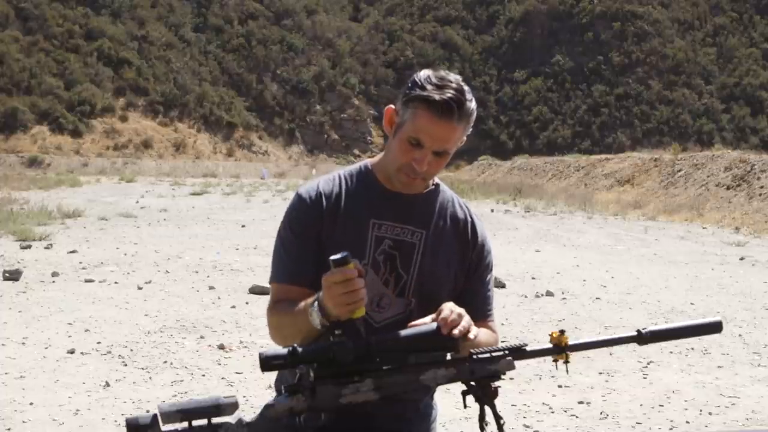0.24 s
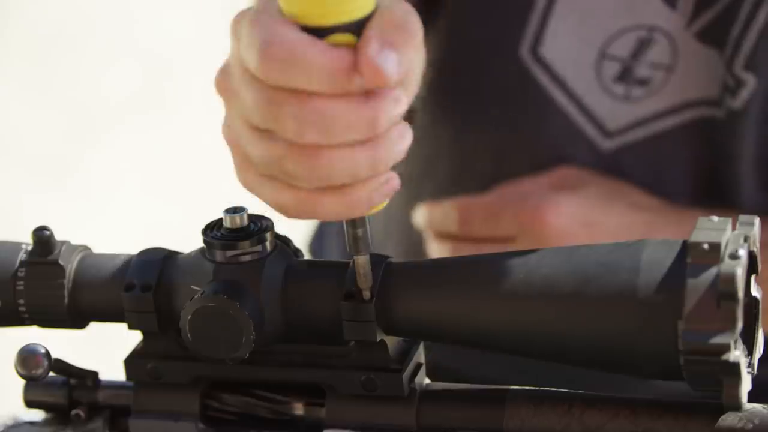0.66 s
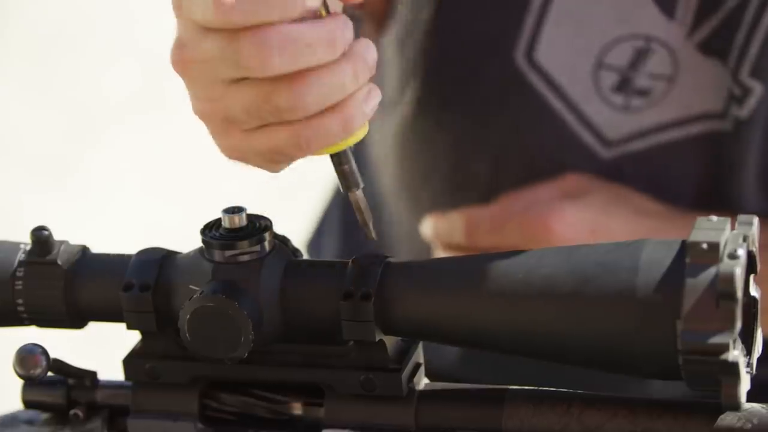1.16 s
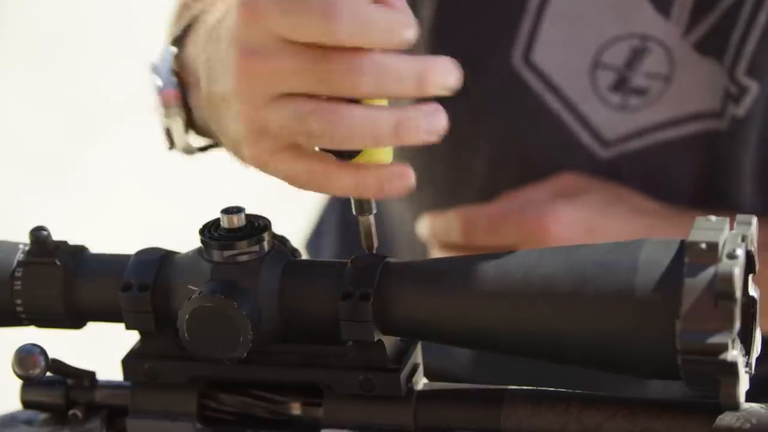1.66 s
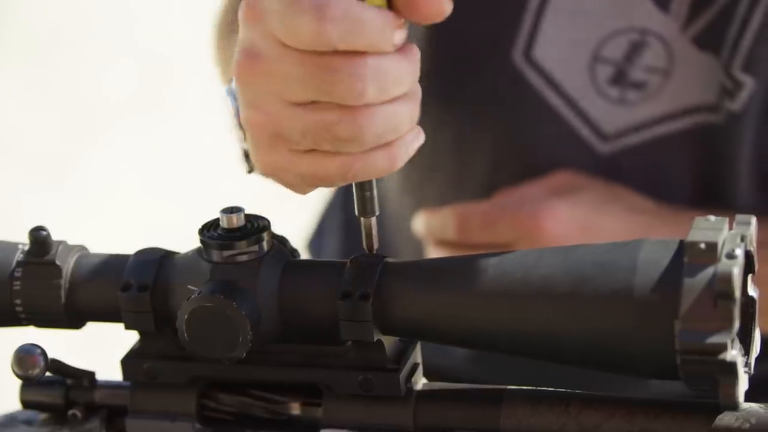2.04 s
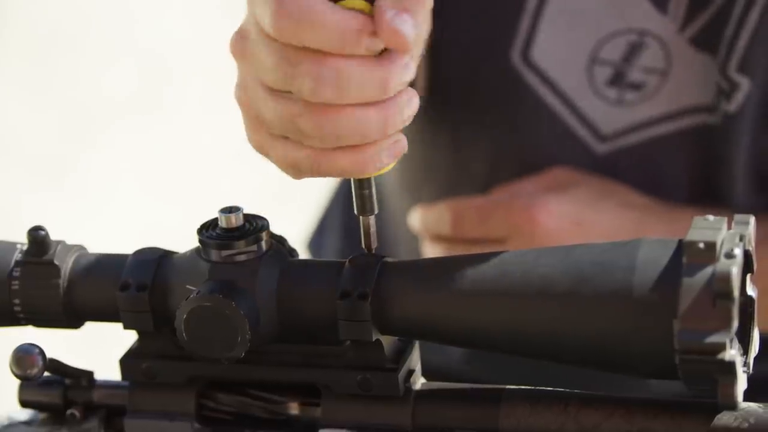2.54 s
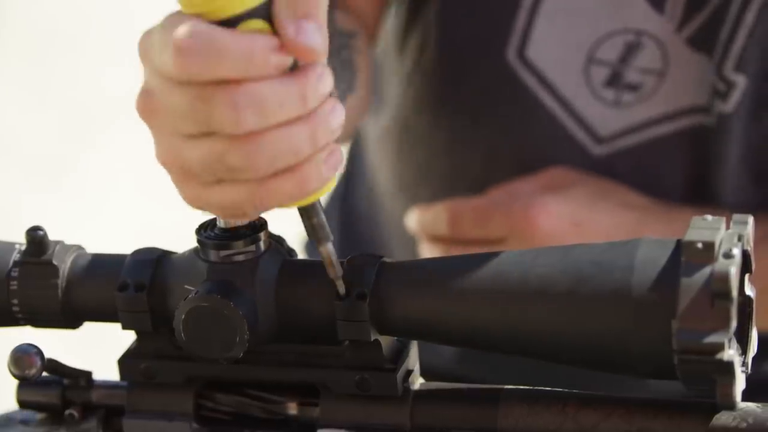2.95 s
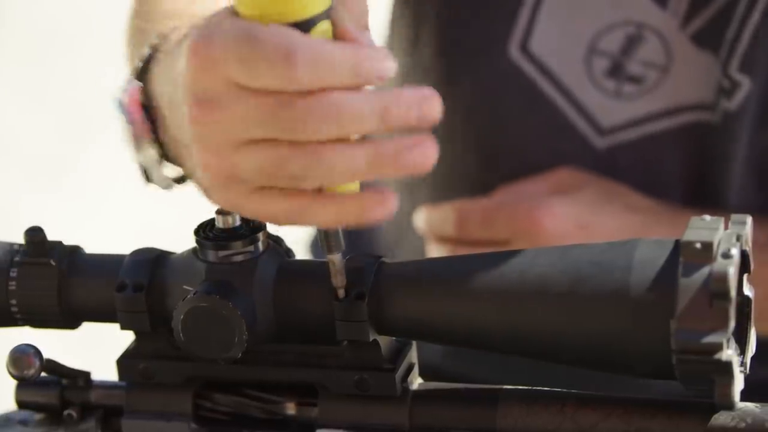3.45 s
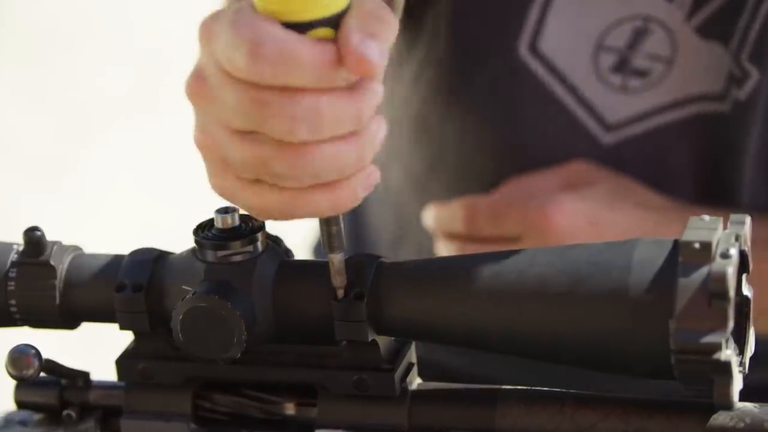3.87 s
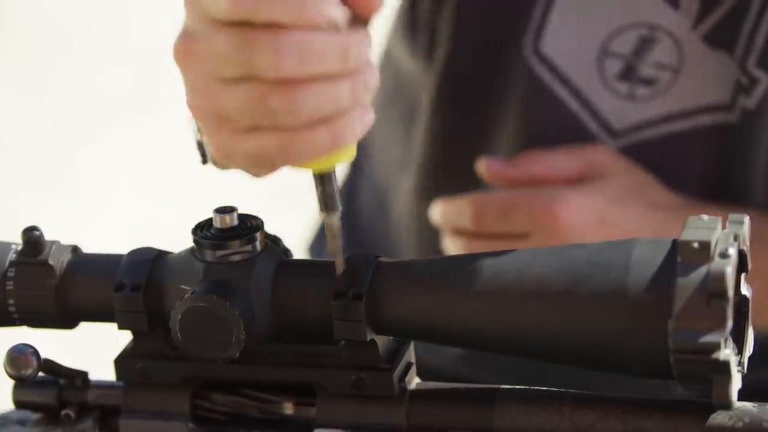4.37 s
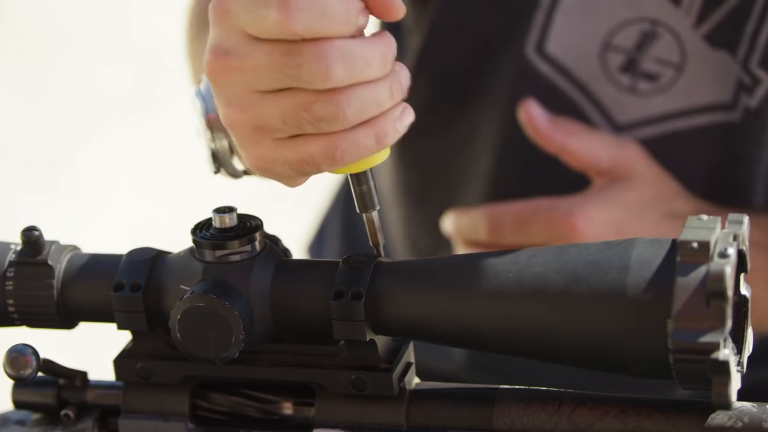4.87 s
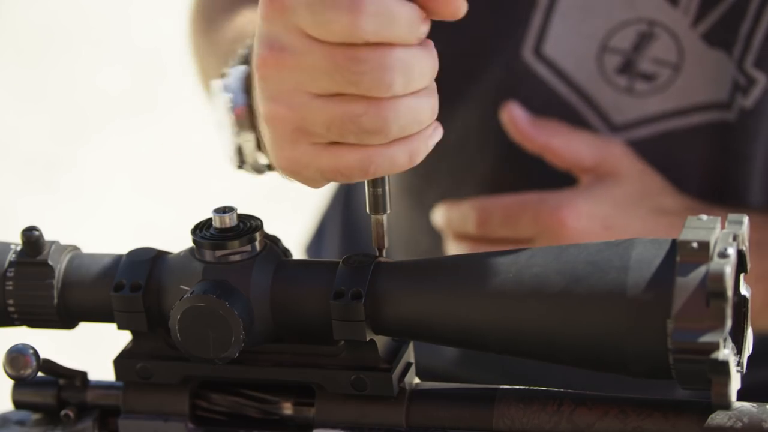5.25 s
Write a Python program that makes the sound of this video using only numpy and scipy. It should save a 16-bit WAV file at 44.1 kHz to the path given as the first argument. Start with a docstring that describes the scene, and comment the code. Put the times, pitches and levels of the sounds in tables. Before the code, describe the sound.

A torque driver tightens small screws on a metal tube mount in the open. Three loud, dry, bright snaps, evenly spaced, stand far above everything else, each with a short metallic ring and noisy scatter. Between them come gritty ticks and knocks as the bit reseats, busiest before the second snap. Wind bumps the nearby microphone; a weak hum and hiss lie behind, calmer at the end.

```python
"""Torque driver on a metal mount, outdoors

A hand-held torque driver tightens small screws: three times its clutch slips with a sharp double snap,
made of damped modes and noise, that rings the tube mount and leaves a noisy echo. Filtered noise bursts
give the bit's ticks in the screw heads, the rubbing of skin and sleeve and the low tails of knocks; steel
tones fade as sines. Wind buffets the microphone as shaped noise and single swings. An open-air murmur of
shaped noise gives way at 0.44 s to hiss and a far machine: a noise drone with one thin sine whine."""
import sys
import numpy as np
from scipy import signal
from scipy.fft import rfft, irfft, next_fast_len
from scipy.io import wavfile
from scipy.ndimage import map_coordinates

SR = 44100
rng = np.random.default_rng(int(sys.argv[2]) if len(sys.argv) > 2 else 0)


def output_pcm(signal):
    """Save a mono or channel-first signal as 16-bit PCM at the path in sys.argv[1].

    Samples are clipped to [-1, 1] before scaling.
    """
    pcm = np.clip(np.atleast_2d(signal).T, -1, 1) * 32767
    wavfile.write(sys.argv[1], SR, np.round(pcm).astype(np.int16))


def attenuation_scalar(level_db):
    """Turn a level in dB into a linear amplitude multiplier (20 dB per decade)."""
    decades = np.asarray(level_db, float) / 20
    return 10 ** decades


N = 242671  # length [samples]

# Open-air murmur spectrum: (frequency [Hz], relative density [dB])
MURMUR_SPECTRUM = [(200, -30.5), (350, -5), (560, -7), (900, -2.5), (1300, -7.5), (2300, -11.5),
                   (3200, -18.5), (6000, -22.5), (11000, -26), (14000, -31), (16500, -45)]
# Wind, two gusty spells, the second much calmer: (time [s], strength [dB], extra flutter [dB])
WIND_SPELLS = [
    [(0, -56, 3), (.28, -57.5, -2.5), (.4, -59.5, 1.5), (.95, -46.5, -3.5), (1.05, -47.5, -1.5),
     (1.22, -41.5, 0), (1.3, -46.5, -3.5), (1.62, -51.5, 1.5), (1.76, -41, -1), (2.05, -52, -2),
     (2.4, -52.5, 0.5), (2.55, -47, 2.5), (2.88, -51, 5), (2.93, -57.5, 2), (3.48, -58.5, -0.5),
     (3.6, -50, -6.5), (3.78, -49.5, -3), (3.85, -58.5, -2), (4.12, -51.5, -3), (4.3, -52, -0.5)],
    [(4.34, -74, 2), (4.54, -65, -3.5), (4.95, -67, -5.5), (5.5, -74, 4)],
]
# Wind noise, lowest to highest layer: (frequency [Hz], relative density [dB])
THUD_SPECTRUM = [(10, -20), (25, 1.5), (45, -2.5), (70, -6.5), (110, -30), (200, -120)]
BUFFET_SPECTRUM = [(30, -36.5), (70, -2.5), (110, -3), (160, -10), (260, -19), (500, -120)]
FLUTTER_SPECTRUM = [(80, -39), (160, -6), (250, -5), (400, -9.5), (600, -25.5), (1200, -120)]
# Thud, buffet, flutter: (level over the reference gust [dB], growth with gust [dB/dB], lumps [dB])
WIND_LAYERS = [(0, .8, 2.5), (-3.5, 1.31, 2.5), (-12.5, 0.8, 3)]
# Steel tones damped by a touch: (frequency [Hz], level [dB], t60 [s], start [s], stop [s])
STEEL_TONES = [(2880, -58.5, 0.98, 0.016, 0.24), (2340, -63, 0.32, 0, .3), (2060, -62.5, 0.31, 0, .3),
               (1140, -61.5, 0.36, 0.014, .3), (1665, -63.5, 0.76, 0.34, 0.375)]
# Bit contacts: (time [s], relative level [dB], body pitch [Hz], bright part [dB], dull part [dB])
BIT_CONTACTS = [(0.0633, -41, 3600, -26, -24), (0.0694, -49, 2890, -20, -6), (0.1954, -61, 2880, -17, -11),
                (0.2344, -61, 2920, -19, -10), (0.2543, -58, 2540, -15, 4), (0.374, -59, 2770, -22, -4),
                (0.2907, -55.5, 4800, -0.5, 1), (0.3235, -54.5, 3760, -15, 4),
                (0.5022, -42, 3830, -15, -2.5), (0.511, -34.5, 2670, -33, -26),
                (0.5297, -43.5, 2860, -31, -3), (0.6841, -54, 2750, 5, -7), (0.784, -47, 6380, -8.5, -13),
                (0.8735, -38.5, 2900, -24, 10), (0.8754, -38, 4900, -15.5, 7), (1.1537, -58.5, 3120, 10, 8),
                (1.243, -62.5, 2434, 12, -1), (1.3852, -46.5, 2610, -6, -5.5),
                (1.4485, -52, 2760, -19, 1.5), (1.5471, -52, 5770, 6.5, -2),
                (1.7669, -31.5, 2576, -9, -8.5), (1.934, -45, 3350, -28.5, 0), (2.0117, -61, 6000, 1, -6.5),
                (2.0315, -40.5, 2060, -10, -1), (2.0705, -31, 2430, -7.5, -10),
                (2.1068, -23, 2840, -14.5, -7), (2.109, -35, 2450, -27, 4), (2.172, -57, 3500, -15.5, -2),
                (2.2415, -32, 3050, -17, -16), (2.2447, -30.5, 4330, 1, -1), (2.2574, -35, 2610, -26, -2),
                (2.2674, -36, 2960, -29, -10), (2.2937, -54, 3110, 6, 1), (2.3192, -55, 3170, 6, 5),
                (2.5646, -44, 2857, -23.5, -10.5), (2.593, -37.5, 3333, -32.5, -10),
                (2.6137, -44, 2610, -24, -5.5), (2.7268, -43, 2560, 1.5, 3), (2.7447, -48.5, 5810, 12, -6),
                (3.0879, -50, 2430, -17, 2.5), (3.223, -60, 3790, 8.5, -1), (3.275, -57, 6220, 8, -9),
                (3.3029, -51, 2880, -5.5, 9.5), (3.6199, -50.5, 2410, -11, 10.5),
                (3.669, -41.5, 3760, -26.5, 4), (3.675, -31, 3900, -34, -10), (3.6864, -36, 3860, -32, 0),
                (3.7695, -42.5, 3900, -11, -7), (3.8164, -46, 3220, -3, -18), (3.826, -55, 3700, 0, -6),
                (3.863, -40, 3780, -5, -19), (3.8742, -37, 3750, -8, 10), (3.8774, -43, 2980, -17, 0),
                (3.8844, -37, 3205, -24, -12), (4.2961, -55.5, 2400, -1, 4),
                (4.3057, -43, 10100, -13.5, -10.5), (4.3345, -54.5, 2700, 8, 1),
                (4.7149, -46.5, 2424, -6, -4.5), (4.9232, -46, 5755, -16, -14),
                (4.9586, -52.5, 2930, -17, 4)]
# Bright, then dull part of a contact: (low edge [Hz], high edge [Hz])
CONTACT_BANDS = [(6000, 12000), (350, 2200)]
# Tube and mount modes: (frequency [Hz], t60 [s], level at first, second, third slip [dB])
MOUNT_MODES = [(1160, 0.24, -45, -46.5, -49), (1228, 0.43, -51.5, -59.5, -53.5),
               (1667, .11, -34.5, -38, -35), (1968, .2, -50, -40.5, -56.5), (2160, 0.14, -51, -40.5, -49.5),
               (2340, 0.26, -49, -46, -41.5), (2610, 0.27, -52.5, -59.5, -49.5),
               (2820, 0.15, -52.5, -43, -54.5), (2883, 0.12, -42, -57.5, -47.5),
               (5823, .08, -47.5, -50.5, -60.5)]
# Each mount mode under a light touch of the bit: relative level [dB]
TAP_LEVELS = [-14, -23, 2, -16.5, -11.5, -12, -21, -15.5, -15, -24]
# Skin and sleeve rubbing, and the low tails of knocks:
# (time [s], length [s], level [dB], low edge [Hz], high edge [Hz])
RUBS_AND_TAILS = [(0.1, 0.092, -64.5, 970, 6600), (0.143, 0.032, -63.5, 2980, 15000),
                  (0.283, 0.041, -73.5, 2500, 12000), (0.33, 0.046, -72, 900, 4970),
                  (1.055, 0.029, -68, 1200, 9400), (2.243, 0.074, -56, 537, 810),
                  (2.103, 0.067, -51.5, 296, 1680), (2.378, 0.11, -68.5, 2960, 15000),
                  (2.26, 0.24, -75, 3500, 15000), (2.725, 0.042, -58.5, 2000, 15000),
                  (3.305, 0.031, -68, 790, 12100), (3.641, 0.052, -65.5, 1200, 6000),
                  (3.876, 0.052, -56, 450, 1480), (3.877, 0.064, -53.5, 178, 350)]
# Single swings of the diaphragm: (time [s], level [dB], frequency [Hz])
DIAPHRAGM_SWINGS = [(0.217, -50.5, 104), (0.637, -41.5, 101), (0.712, -39.5, 78.1), (0.921, -40.5, 105),
                    (1.163, -33.5, 126), (1.227, -37.5, 64), (1.432, -33.5, 56.5), (1.559, -37, 52),
                    (1.687, -35, 97.5), (1.759, -35, 61.9), (1.898, -46, 109), (2.13, -45, 45.8),
                    (2.36, -39.5, 47.9), (2.455, -36.5, 111), (2.621, -34, 45.8), (2.689, -40, 46.3),
                    (2.829, -43, 87.8), (2.971, -48.5, 70.8), (3.092, -45, 66), (3.556, -37, 71.9),
                    (3.725, -34, 95.2), (3.865, -54, 56.5), (4.074, -43, 45.2), (4.518, -48, 67),
                    (4.624, -49, 70.6), (4.739, -49.5, 59.2), (4.837, -53.5, 45.8), (4.948, -56, 53.8)]
# Far machine's drone, then the hiss: (frequency [Hz], relative density [dB])
DRONE_SPECTRUM = [(210, -62.5), (350, -29.5), (408, -22.5), (428, -11.5), (463, -19.5), (530, -13.5),
                  (714, -9.5), (742, -4), (801, -10.5), (900, -6), (1360, -26.5), (1620, -17), (1850, -13),
                  (2270, -23.5), (3060, -28), (3500, -42), (4550, -57), (7700, -120)]
HISS_SPECTRUM = [(1350, -29), (2300, -8.5), (2780, -7.5), (3150, -6.5), (3440, -9), (4640, -9),
                 (6190, -13.5), (10100, -8), (12300, -13.5), (15300, -17), (16500, -27.5)]
# Whine's swelling and fading: (time [s], level [dB])
WHINE_SWELL = [(0.44, -64.5), (0.6, -64), (0.81, -72), (0.9, -65), (1.12, -73.5), (1.86, -70),
               (1.98, -62.5), (2.2, -66), (2.5, -65), (2.6, -78), (2.81, -64), (3.0, -72.5), (3.6, -66),
               (3.74, -81), (3.88, -65.5), (4.2, -77), (4.36, -69), (4.78, -65), (4.92, -80), (5.02, -68),
               (5.5, -72)]
# Clutch slips, relative levels: (time [s], release [dB], stop [dB], shaft [dB], dulling [dB/octave])
CLUTCH_SLIPS = [(0.8828, -9, -4.5, -1, -2.5), (2.4917, -10, -5, -5, 5), (4.0942, -7, -5.5, 0, -1)]
# Clutch (upper) modes, then shaft (lower) modes: (frequency [Hz], relative level [dB], free t60 [s])
CLUTCH_MODES = [(8540, -12, 0.033), (9675, -4.5, .006), (10250, -1.5, 0.01), (11000, 2.5, 0.012),
                (12500, -5.5, 0.0045), (13000, -4.5, .004), (15000, -13.5, .003)]
SHAFT_MODES = [(2190, -17.5, 0.0092), (2750, -16.5, .012), (3500, -26, 0.0027), (4430, -9, 0.0077),
               (4620, -10.5, 0.011), (6010, -11.5, 0.013), (6670, -12.5, .008)]
# Scattered echo's spectrum: (frequency [Hz], relative density [dB])
ECHO_SPECTRUM = [(290, -49.5), (500, -12.5), (1190, -7), (1520, -12), (1660, -2.5), (1810, -21),
                 (2040, -1.5), (3070, -11.5), (11000, -11), (15300, -21.5), (16500, -46)]
# Scattered echo's decay: (frequency [Hz], t60 [s])
ECHO_DECAY = [(700, 0.067), (2500, 0.088), (6000, 0.083), (10500, 0.1), (13000, .085), (16000, .06)]

GUST_REF_DB = -55  # the middling gust that the wind layers are set against
CONTACT_T60_S, CONTACT_RING_DB = .024, -17  # reference decay of a contact; trim of the mount's ring
FAINT_DB, FAINT_SPREAD_DB = -67.5, 7  # relative level of faint chance contacts
SWING_CENTRE_S = 0.015  # a swing crosses zero this long after its listed time
DRONE_FROM_S = .436  # the murmur gives way to drone and hiss
DRONE_DB, HISS_DB, WHINE_HZ = -63, -73.5, 758.5
STOP_AFTER_S, ECHO_DB = .0011, -31.5  # the clutch reaches its stop this long after the release
CEILING, TOP_HZ = .62, 16300  # amplitude near which the input stage rounds peaks; band limit


def unit(x):
    """Normalisation: scale to rms 1."""
    return x / np.sqrt(np.mean(x ** 2) + 1e-20)


def along(points, hz):
    """Logarithmic frequency scale: interpolate (frequency [Hz], value) points along it."""
    f, v = np.transpose(points)
    return np.interp(np.log(hz + 1), np.log(f + 1), v)


def curves(rows):
    """Linear interpolation: one value per sample for each column after the time."""
    s, *cols = np.transpose(rows)
    return [np.interp(np.arange(N) / SR, s, c) for c in cols]


def wobble(rate):
    """Slow random modulation: a smooth curve through `rate` random knots a second."""
    knots = rng.standard_normal(int(N * rate / SR) + 4)
    return map_coordinates(knots, [np.arange(N) * rate / SR])


def rush(spectrum, lumpy_db, rate):
    """Spectral shaping: coloured noise of rms 1 whose level wanders."""
    m = next_fast_len(N + 8192)
    raw = rng.standard_normal(N) * attenuation_scalar(lumpy_db * wobble(rate))
    gain = attenuation_scalar(along(spectrum, np.fft.rfftfreq(m, 1 / SR)))
    return unit(irfft(rfft(raw, m) * gain, m)[:N])


def band(low_hz, high_hz, count):
    """Band-pass filtering: noise between two edges, of rms 1."""
    sos = signal.butter(2, [low_hz, high_hz], "bandpass", fs=SR, output="sos")
    return unit(signal.sosfilt(sos, rng.standard_normal(count)))


def ring(modes, t, spread_db, attack, smear, dull_db=0):
    """Modal superposition: damped sines, newly weighted each blow; long contact smears phases and dulls."""
    hz, db, t60 = np.transpose(modes)[:, :, None]
    tilt_db = -dull_db * np.log2(hz / hz.mean())
    chance_db = spread_db * rng.standard_normal(hz.shape)
    size = attenuation_scalar(db + tilt_db + chance_db - 60 * t / t60)
    phase = 2 * np.pi * (hz * t + smear * rng.random(hz.shape))
    return (size * np.sin(phase)).sum(axis=0) * (1 - np.exp(-t / attack))


def mount(levels_db):
    """Modal excitation: the mount's modes as (frequency [Hz], level [dB], t60 [s]) for one blow."""
    hz, t60 = np.transpose(MOUNT_MODES)[:2]
    return np.transpose([hz, levels_db, t60])


def add(track, s, sound):
    """Linear superposition: lay a sound on the track at a time [s]."""
    track[round(s * SR):][:len(sound)] += sound


def after_change():
    """Cross-fade: a ramp from 0 to 1 as the murmur gives way to drone and hiss."""
    return np.clip((np.arange(N) / SR - DRONE_FROM_S) / 0.0056, 0, 1)


def murmur():
    """Diffuse sound field: shaped noise of the open air, until the drone replaces it."""
    return (1 - after_change()) * attenuation_scalar(-67.5) * rush(MURMUR_SPECTRUM, lumpy_db=1, rate=20)


def wind():
    """Turbulent pressure: eddies push the diaphragm in lumps, and stronger gusts reach higher."""
    strength_db, extra_flutter_db = curves(np.concatenate(WIND_SPELLS))
    gust_db, eddy = strength_db - GUST_REF_DB, wobble(22)
    layers = []
    for spectrum, layer in zip((THUD_SPECTRUM, BUFFET_SPECTRUM, FLUTTER_SPECTRUM), WIND_LAYERS):
        over_db, growth, lumps_db = layer
        level_db = GUST_REF_DB + over_db + growth * gust_db + lumps_db * eddy
        layers.append(attenuation_scalar(level_db) * rush(spectrum, lumpy_db=1.3, rate=22))
    thud, buffet, flutter = layers
    return thud + buffet + attenuation_scalar(extra_flutter_db) * flutter


def steel_tones():
    """Exponential decay of free vibration: thin steel tones fading, cut short by a touch."""
    out, t = np.zeros(N), np.arange(N) / SR
    for hz, db, t60, start, stop in STEEL_TONES:
        gate = np.clip((t - start) / 0.0095, 0, 1) * np.clip((stop - t) / .015, 0, 1)
        level_db = db - 60 * np.abs(t - start) / t60 + 1.3 * wobble(31.0)
        out += attenuation_scalar(level_db) * gate * np.sin(2 * np.pi * hz * t)
    return out


def faint_ticks(count):
    """Random impacts: faint chance contacts, as rows like BIT_CONTACTS."""
    when, size, pitch, bright, dull = rng.random((count, 5)).T
    db = FAINT_DB + FAINT_SPREAD_DB * (2 * size - 1)
    return np.transpose([when * N / SR, db, 2500 + 1500 * pitch, -18 + 22 * bright, -4 + 9 * dull])


def ticks():
    """Impact excitation: a gritty burst around its own pitch nudges the mount; the treble dies first."""
    out, t = np.zeros(N + SR), np.arange(SR // 5) / SR
    modes = mount(TAP_LEVELS)
    onset = 1 - np.exp(-t / 0.00043)

    def fade(stretch):
        """Exponential decay: a multiple of the reference decay time."""
        return attenuation_scalar(-60 * t / (stretch * CONTACT_T60_S))

    for s, db, hz, bright_db, dull_db in [*BIT_CONTACTS, *faint_ticks(count=14)]:
        bright, dull = (band(*edges, len(t)) for edges in CONTACT_BANDS)
        body = fade(0.58) * band(hz / 1.2, hz * 1.52, len(t))
        body += attenuation_scalar(-6.5) * fade(0.99) * band(hz / 0.87, hz * 1.15, len(t))
        burst = body + attenuation_scalar(bright_db) * fade(0.55) * bright + attenuation_scalar(dull_db) * fade(1.2) * dull
        damping = attenuation_scalar(CONTACT_RING_DB - 60 * t / 0.26)  # the resting bit damps the mount
        hum = damping * ring(modes, t, spread_db=4.0, attack=0.0014, smear=0.79)
        add(out, s, attenuation_scalar(db - 5.5) * (burst * onset + hum))
    return out[:N]


def rubs_and_tails():
    """Dry friction and knock tails: short grainy swells of noise that rise faster than they fade."""
    out = np.zeros(N + SR)
    for s, length, db, low_hz, high_hz in RUBS_AND_TAILS:
        count = round(length * SR)
        swell = np.sin(np.pi * np.linspace(0, 1, count) ** 0.44)
        grit = attenuation_scalar(2.3 * wobble(60)[:count] + 3.3 * wobble(500)[:count])
        add(out, s, attenuation_scalar(db) * swell * grit * band(low_hz, high_hz, count))
    return out[:N]


def diaphragm_swings():
    """Transient displacement: wind moves the diaphragm in single swings, a pull and then a push."""
    out, t = np.zeros(N), np.arange(N) / SR
    for s, db, hz in DIAPHRAGM_SWINGS:
        cycles = (t - s - SWING_CENTRE_S) * hz
        swing = np.sin(2 * np.pi * cycles) + .2 * np.sin(4 * np.pi * cycles)
        out += attenuation_scalar(db) * swing * np.exp(-(cycles / 0.57) ** 2)
    return out


def far_machine():
    """Broadband and tonal radiation: a noise drone and one sine whine that swells and fades."""
    t = np.arange(N) / SR
    whine_db, = curves(WHINE_SWELL)
    tone = np.sin(2 * np.pi * WHINE_HZ * t + 0.22 * wobble(8))
    whine = np.sqrt(2) * attenuation_scalar(whine_db + 1.5 * wobble(14)) * tone
    drone = attenuation_scalar(DRONE_DB + .6 * wobble(1.1)) * rush(DRONE_SPECTRUM, lumpy_db=0.7, rate=21)
    return after_change() * (drone + whine)


def hiss():
    """Stationary random noise: a shaped hiss of gently wandering level beside the drone."""
    return after_change() * attenuation_scalar(HISS_DB + .8 * wobble(2.5)) * rush(HISS_SPECTRUM, lumpy_db=1.42, rate=40)


def echo(count):
    """Diffuse scattering off ground and body: noise dying at its own speed per frequency."""
    hz, t, z = signal.stft(rng.standard_normal(count), SR, nperseg=128)
    gain = attenuation_scalar(along(ECHO_SPECTRUM, hz)[:, None] - 60 * t / along(ECHO_DECAY, hz)[:, None])
    tail = signal.istft(z * gain, SR, nperseg=128)[1][:count]
    return tail / np.sqrt(np.mean(tail[:count // 40] ** 2))  # its beginning has rms 1


def snaps():
    """Release of stored strain: the clutch lets go, then slams on its stop; the mount rings on."""
    out, t = np.zeros(N + SR), np.arange(SR // 2) / SR
    seat = attenuation_scalar(-8) + attenuation_scalar(-60 * t / .004)  # the parts seat and damp most of the ring at once
    mount_levels = np.transpose(MOUNT_MODES)[2:]
    for slip, levels_db in zip(CLUTCH_SLIPS, mount_levels):
        s, release_db, stop_db, shaft_db, dull_db = slip
        for start, db in ((s, release_db), (s + STOP_AFTER_S, stop_db)):
            clutch = ring(CLUTCH_MODES, t, spread_db=3.5, attack=.00005, smear=0.6, dull_db=dull_db)
            shaft = ring(SHAFT_MODES, t, spread_db=3.0, attack=.00008, smear=.6)
            # loose parts shake for a moment
            chatter = attenuation_scalar(-15.5 - 60 * t / 0.018) * band(1500, 15000, len(t))
            add(out, start, attenuation_scalar(db - 6) * (clutch * seat + attenuation_scalar(shaft_db) * shaft + chatter))
        mount_ring = ring(mount(levels_db), t, spread_db=1.3, attack=0.008, smear=0.89)
        beating = attenuation_scalar(2.2 * wobble(90)[:len(t)])  # close modes beat
        add(out, s, mount_ring * beating)
        add(out, s, attenuation_scalar(ECHO_DB) * echo(len(t)) * (1 - np.exp(-t / 0.0056)))
    return out[:N]


def scene():
    """Linear superposition: all sources at one microphone."""
    air = murmur() + wind() + diaphragm_swings()
    handling = steel_tones() + ticks() + rubs_and_tails() + snaps()
    return (air + handling + far_machine() + hiss())[None]


def top_cut(x):
    """Nothing passes above the cut-off."""
    return signal.sosfilt(signal.butter(12, 17030, fs=SR, output="sos"), x)


def record(dry):
    """Saturation and low-pass filtering: soft overload of the highest peaks, then a steep band limit."""
    rounded = dry / (1 + np.abs(dry / CEILING) ** 4) ** (1 / 4)
    low_pass = signal.cheby1(10, .5, TOP_HZ, fs=SR, output="sos")
    finished = signal.sosfilt(low_pass, rounded)
    return top_cut(finished)


dry = scene()
out = record(dry)
output_pcm(out)
```